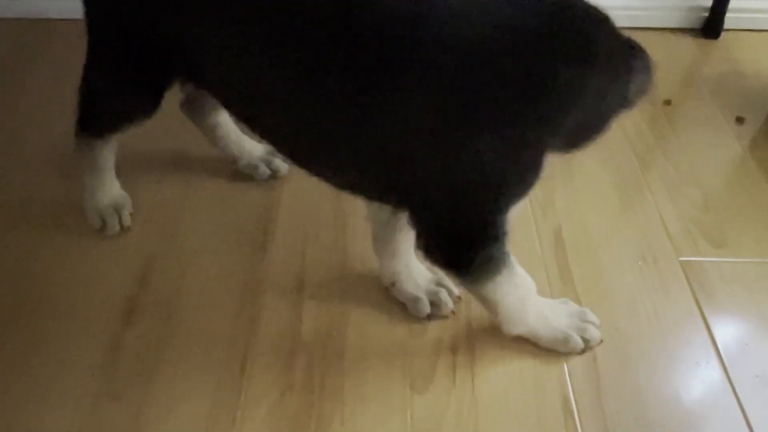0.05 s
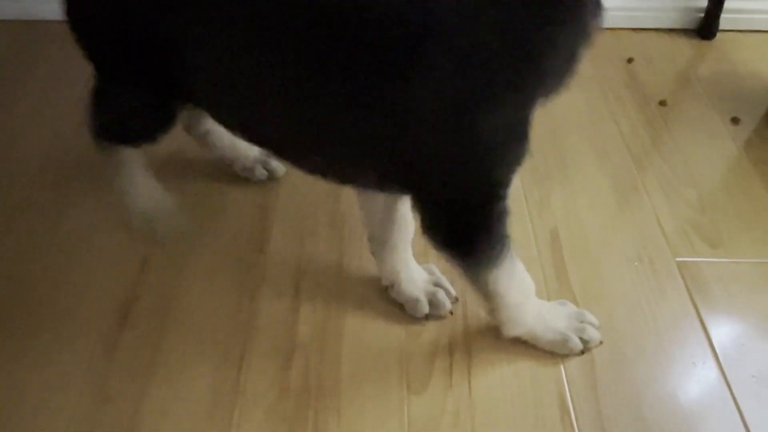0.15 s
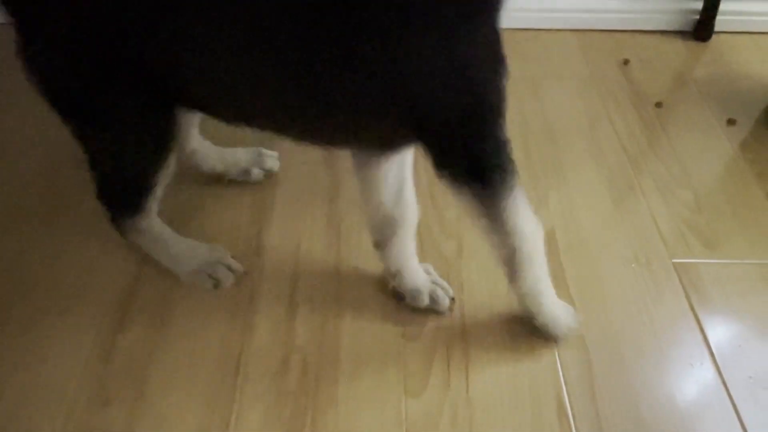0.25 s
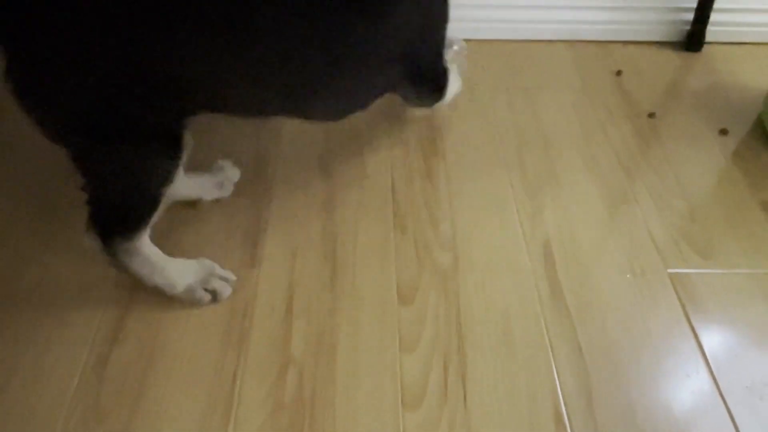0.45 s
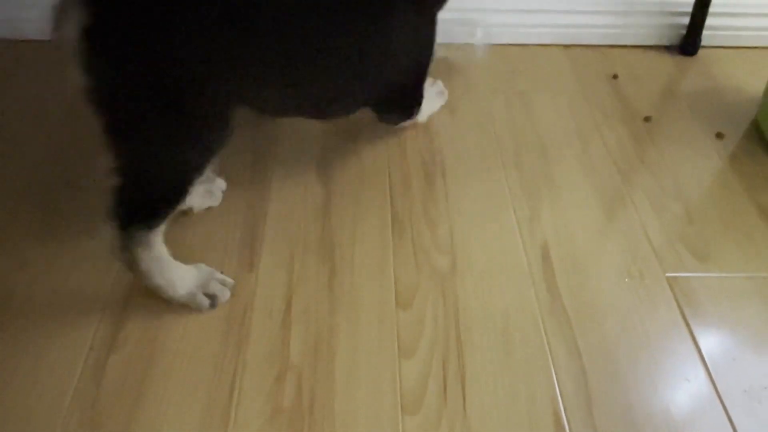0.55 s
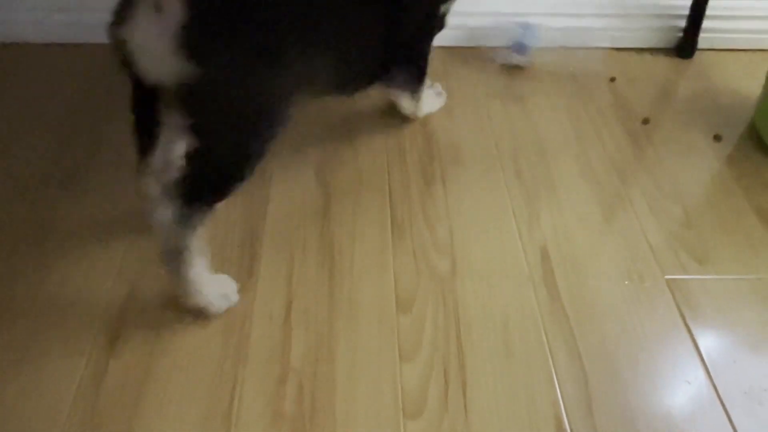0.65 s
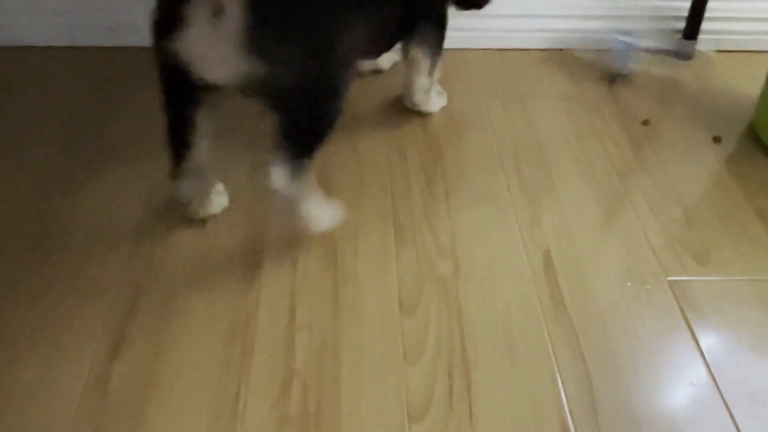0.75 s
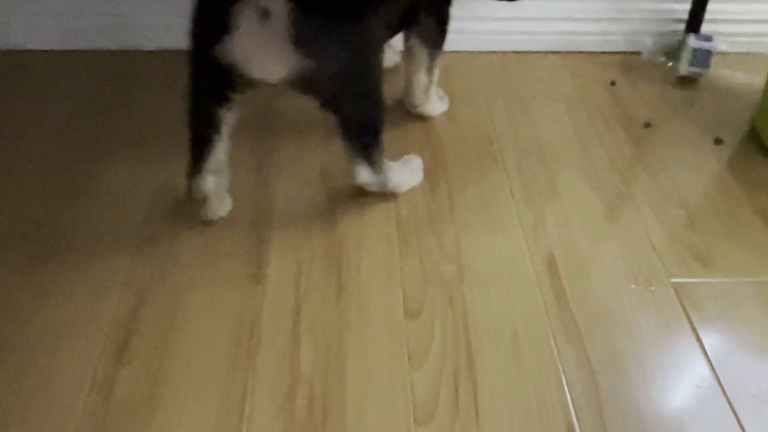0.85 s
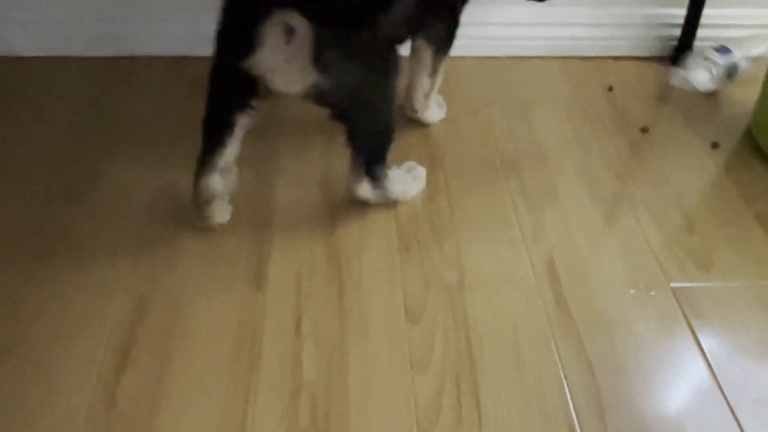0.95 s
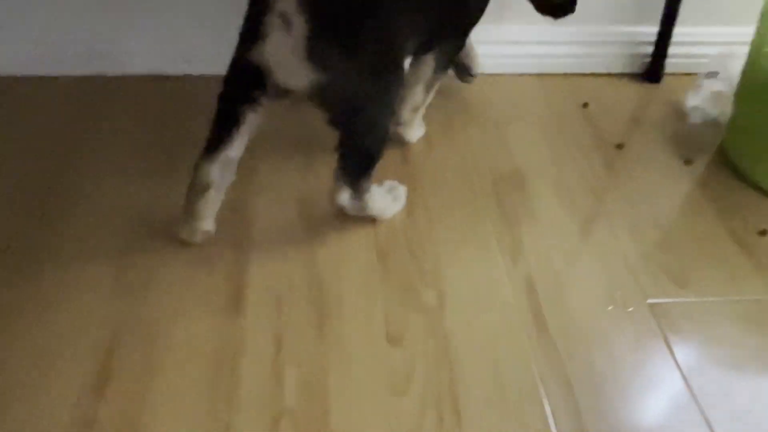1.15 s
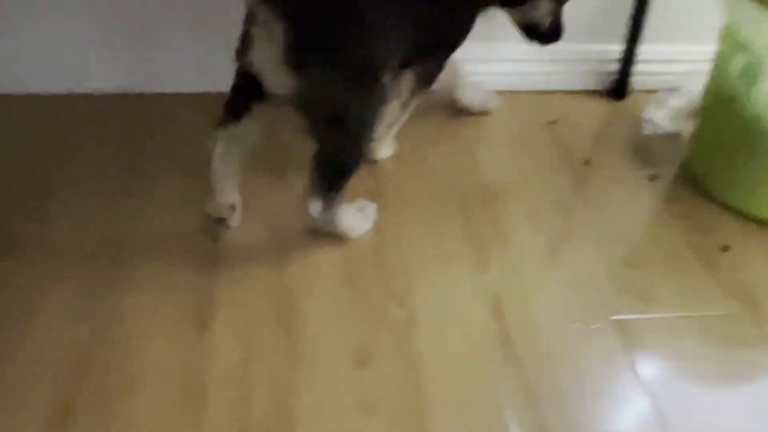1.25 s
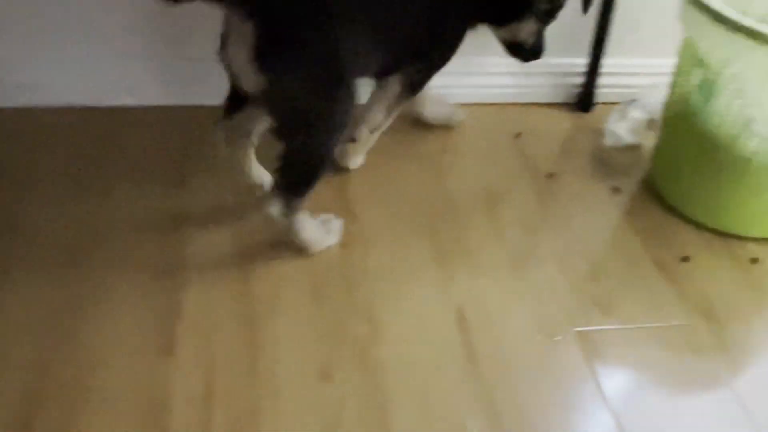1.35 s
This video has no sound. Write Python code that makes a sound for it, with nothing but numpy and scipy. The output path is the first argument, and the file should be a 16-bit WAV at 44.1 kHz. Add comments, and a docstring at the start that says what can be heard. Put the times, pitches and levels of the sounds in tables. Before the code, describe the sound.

A light plastic bottle clatters over a hard floor close by in a small, slightly echoing room. After soft dog steps and a low thump, it lands with a hollow knock, scrapes briefly, then bounces a few times, fading.

```python
"""Pads and claws tap on a laminate floor in a small, hard room: a dog is batting an empty plastic bottle. The
bottle lands with hollow pops and bounces to rest by the wall, while claws skid across the floor with a
crinkling scrape. Each impact excites damped modes of the bottle and the boards, and sliding friction makes the
scrape. The heavier steps make the floor boom. The room reverberates, over a low rumble and a faint hiss."""
import sys
import numpy as np
from scipy import signal
from scipy.fft import rfft, irfft, next_fast_len
from scipy.io import wavfile
from scipy.ndimage import uniform_filter1d

SR = 44100
rng = np.random.default_rng(int(sys.argv[2]) if len(sys.argv) > 2 else 0)


def master(y):
    """Save y as 16-bit WAV."""
    cut = np.clip(np.atleast_2d(y).T, -1, 1)
    pcm = np.round(cut * 32767)  # scale
    wavfile.write(sys.argv[1], SR, pcm.astype(np.int16))


N = 61739


def bottle():
    """Impact excitation: a blow sounds bottle, boards and room modes; light contacts only rattle."""
    # blows: t/s; hollow tone f/Hz, level/dB, rise/s, left lead/rad, left minus right/dB;
    # belly mode f/Hz, level/dB; panel f/Hz, level/dB, T60/s, overtone gain/dB;
    # clack level/dB, contact cut-off/Hz; crack level/dB; board knock level/dB, pitch ratio
    blows = [(.3900, 501.4, -2.5, 0.012, 1, -4, 719, -17, 1465, -6.5, 0.014, -45, -22, 2240, -33, -42, 0.89),
             (.5470, 484.7, -14, 0.0031, 0.53, -1.5, 662, -23.5, 1400, -1, 0.007, -27, -18.5, 3100, -30, -31, 1.1),
             (0.795, 529, -31.5, 0.0089, -1, 10, 795, -28, 1566, -27, 0.044, -6.5, -41.5, 5000, -35.5, -35.5, 1.18),
             (0.8572, 492.4, -5, 0.0076, -0.53, 5.5, 899, -20.5, 2385, -26.5, 0.043, -23.5, -28.5, 1880, -27, -16.5, 0.98),
             (1.035, 476, -16, 0.0063, -0.6, 2.5, 746, -36.5, 1570, -48, 0.027, -12, -47, 3020, -44, -29, 1.003),
             (1.1450, 507, -31, 0.012, -2.5, -1, 720, -38.5, 1770, -54, 0.065, -31, -43.5, 1800, -43.5, -37.5, 1.23)]
    # light contacts of the shell: t/s, level/dB
    rattles = [(0.468, -45.5), (0.503, -54), (0.565, -25.5), (0.577, -27), (.588, -25.5), (.593, -28),
               (0.61, -33.5), (.628, -31), (0.669, -38.5)]
    # buzz of the flexing wall around the hollow tone: f/Hz, relative level/dB
    flex_spectrum = [(120, -82), (280, -12), (480, 13.5), (650, -18.5), (900, -6.5), (1500, -38),
                     (4000, -81.5)]
    # bright crack of the impact: f/Hz, relative level/dB
    crack_spectrum = [(500, -31), (2000, 5), (3000, 15.5), (4500, 2), (8500, 3.5), (11000, -1.5),
                      (15000, -14), (17000, -34.5)]
    # modes of the struck boards: f/Hz at pitch ratio 1, relative level/dB, T60/s
    board_modes = [(183.8, -1, 0.06), (310, 4, 0.068), (389.2, -8, 0.24)]
    # standing waves of the room, set off by the hollow tone: f/Hz, relative level/dB, T60/s
    room_modes = [(286, -25.5, 0.308), (340, -53, 0.37), (396.5, -34.5, 0.63), (510, -22, 0.49),
                  (580, -45, 0.13), (704, -46, 0.29)]
    out = in_room(sum(amp(db) * clack(s) for s, db in rattles))
    for (s, hollow_hz, hollow_db, rise_s, lead_rad, pan_db, belly_hz, belly_db,
         panel_hz, panel_db, panel_t60, overtone_db,
         clack_db, contact_hz, crack_db, knock_db, board_pitch) in blows:
        hollow = amp(hollow_db) * hollow_tone(s, hollow_hz, rise_s, lead_rad, pan_db)
        flex = amp(hollow_db - 11.5) * burst(s, flex_spectrum, t60=0.097, rise_s=0.002)
        belly = ring(s, [(belly_hz, belly_db, 0.068)], rise_s=0.0024)
        panel = panel_pop(s, panel_hz, panel_db, panel_t60, overtone_db)
        shell = amp(clack_db) * contact_lowpass(clack(s), contact_hz)
        crack = amp(crack_db) * burst(s, crack_spectrum, t60=0.037, rise_s=0.0008)
        boards = [(board_pitch * hz, db, t60) for hz, db, t60 in board_modes]
        knock = amp(knock_db) * ring(s, boards, rise_s=0.0024)
        out += in_room(hollow, send_db=-1.5)
        out += in_room(flex + shell + crack + knock)
        out += in_room(belly + panel, send_db=-8)
        out += amp(hollow_db) * ring(s, room_modes, rise_s=0.013)
    return out


def hollow_tone(s, hz, rise_s, lead_rad, pan_db):
    """Damped resonance: one tone swells and dies, with a level and phase difference between the ears."""
    t = since(s)
    ears = np.array([[0.5], [-0.5]])
    swell = fade(t, t60=0.069) * (1 - np.exp(-(t / rise_s) ** 2))
    return 2 * swell * amp(pan_db * ears) * np.sin(2 * np.pi * hz * t + lead_rad * ears)


def panel_pop(s, hz, level_db, t60, overtone_db):
    """Plate vibration: the struck panel sounds a fundamental and inharmonic overtones."""
    # panel overtones: ratio to the fundamental, relative level/dB
    partials = [(1.74, 1), (2.23, -2.5), (3.06, -6)]
    overtones = [(ratio * hz, level_db + overtone_db + db, t60) for ratio, db in partials]
    return ring(s, [(hz, level_db, t60)] + overtones, rise_s=0.00044)


def clack(s):
    """Shell vibration: the thin plastic wall rings briefly over a dense spray of buckling noise."""
    # modes of the shell: f/Hz, relative level/dB, T60/s
    shell_modes = [(630, -3.5, 0.074), (803, 4, 0.039), (1048, 8, 0.069), (1315, 1, 0.037),
                   (1411, -2.5, 0.061), (1594, 5.5, 0.045), (1700, 9.5, 0.026), (1798, 2, 0.05),
                   (2400, -0.5, 0.045), (2700, -6.5, 0.097), (2940, -1, 0.029), (3740, -13, 0.027)]
    # buckling noise: f/Hz, relative level/dB
    buckling_spectrum = [(200, -9), (550, 3), (1000, -12), (1500, -4.5), (2100, -9), (3300, -10.5),
                         (4300, -21.5), (9000, -28), (16000, -95)]
    ringing = 0.49 * ring(s, shell_modes, rise_s=0.00095)
    buckling = amp(5) * burst(s, buckling_spectrum, t60=0.063, rise_s=0.00046)
    return ringing + buckling


def contact_lowpass(x, cutoff_hz):
    """A contact acts as a second-order low-pass on the vibration it excites."""
    return filtered(x, lambda hz: 1 / (1 + 1j * np.sqrt(2) * hz / cutoff_hz - (hz / cutoff_hz) ** 2))


def skid():
    """Sliding friction: a grainy scrape swells and dies, hissing where fastest and leaving a low ring."""
    # scrape: f/Hz, relative level/dB
    scrape_spectrum = [(250, 3), (600, -3), (1600, 0), (2200, -2.5), (2900, 4.5), (4000, -11), (5200, -6.5),
                       (6500, -12.5), (8200, -5.5), (11000, -14.5), (15000, -19), (17000, -47)]
    # hiss of the fastest sliding: f/Hz, relative level/dB
    hiss_spectrum = [(3500, -29), (5300, 3.5), (6500, -6), (8200, -11), (12000, -17.5)]
    # modes of bottle and room that hum along: f/Hz, relative level/dB, T60/s
    hum_modes = [(493, 4, 0.29), (319.4, -1.5, 0.2), (620, -8, 0.18), (770, -11, 0.56), (1050, -1, 0.25)]
    peak_s, peak_db, rise_db_per_s, fall_db_per_s, roughness_db = 0.5915, -25.5, 368, 212, 2
    t = np.arange(N) / SR - peak_s
    level_db = peak_db + np.minimum(rise_db_per_s * t, -fall_db_per_s * t)
    grain = amp(roughness_db * unit(uniform_filter1d(rng.standard_normal(N), size=60)))
    hum = amp(-24.5) * ring(peak_s, hum_modes, rise_s=0.018)
    hiss = amp(-21.5) * burst(peak_s, hiss_spectrum, t60=0.052, rise_s=0.0045)
    scrape = amp(level_db) * unit(noise(scrape_spectrum) * grain)
    return in_room(scrape) + hiss + hum


def paw_steps():
    """Soft and hard contact: pads excite low modes of the boards, claws scratch across a broad band."""
    # steps: t/s, pad pitch ratio, pad level/dB, claw level/dB
    steps = [(.000, 1.084, -32.5, -35), (0.0544, 1.06, -29, -41.5), (0.101, 1.02, -34.5, -41.5),
             (0.125, 1, -42, -31), (0.1315, 1.08, -26.5, -34.5), (0.2226, 0.72, -35, -36),
             (0.298, 0.98, -28.5, -34), (0.4931, 1.28, -32, -26), (0.5018, 1.3, -27.5, -22.5),
             (0.67, 0.91, -28, -75), (.737, 0.98, -36, -35.5), (.897, 1.03, -25, -31.5),
             (1.139, 1.2, -72, -39.5), (1.246, 0.94, -45, -48.5)]
    # boards under a pad: f/Hz at pitch ratio 1, relative level/dB, T60/s
    pad_modes = [(313.4, 1.5, 0.085), (383.7, -9, 0.19), (506, 2, 0.072)]
    # claw scratch: f/Hz, relative level/dB
    claw_spectrum = [(400, 17.5), (1500, 14), (3000, 10.5), (4500, 0), (8500, 4.5), (11000, -2.5),
                     (15000, -13.5), (17000, -12)]
    out = np.zeros((2, N))
    for s, pitch, pad_db, claw_db in steps:
        modes = [(pitch * hz, db, t60) for hz, db, t60 in pad_modes]
        pad = amp(pad_db) * ring(s, modes, rise_s=0.0023)
        claw = amp(claw_db) * burst(s, claw_spectrum, t60=0.065, rise_s=0.0022)
        out += in_room(pad + claw)
    return out


def claw_clicks():
    """A brief impact has a wide spectrum: a claw ticks close by and rings in its own high modes."""
    # clicks: t/s, tick level/dB, snap level/dB, reverberation gain/dB
    clicks = [(0.234, -30, -43.5, -2), (0.9444, -28.5, -29.5, 2.5)]
    # tick: f/Hz, relative level/dB
    tick_spectrum = [(500, 11.5), (3000, 2.5), (5000, -2.5), (8000, 2), (11000, 1.5), (16000, 2)]
    # modes of the claw: f/Hz, relative level/dB, T60/s
    claw_modes = [(5050, -7.5, 0.034), (7610, -5, 0.023), (9300, -6, 0.023)]
    out = np.zeros((2, N))
    for s, tick_db, snap_db, send_db in clicks:
        tick = amp(tick_db) * burst(s, tick_spectrum, t60=0.022, rise_s=0.0006)
        out += in_room(tick, send_db)
        out += amp(snap_db) * ring(s, claw_modes, rise_s=0.0005)
    return out


def floor_boom():
    """Free vibration: the dog's weight sets the whole floor swinging in its low modes."""
    # heavy footfalls: t/s, level/dB
    footfalls = [(0.2411, -17.5), (0.276, -24), (0.517, -29), (0.583, -31.5), (0.649, -35), (0.898, -37.5),
                 (1.316, -42.5)]
    # modes of the floor on its joists: f/Hz, relative level/dB, T60/s
    floor_modes = [(62.9, 2, 0.26), (85.6, 8, 0.045), (128.5, 0, 0.063), (190, -4, 0.022)]
    return sum(amp(db) * ring(s, floor_modes, rise_s=0.0015) for s, db in footfalls)


def in_room(x, send_db=0):
    """Reverberation: the direct sound is followed by a diffuse tail, partly different in each ear."""
    # reverberation time: f/Hz, T60/s
    decay_times = [(100, 0.21), (500, 0.35), (1500, 0.28), (4000, 0.26), (9000, 0.36), (16000, 0.19)]
    # colour of the tail: f/Hz, relative level/dB
    colour = [(60, -8), (300, -15), (500, -13.5), (750, -4), (2000, -3), (8000, -1), (16000, -3.5)]
    # width of the tail: f/Hz, ratio of side to mid
    width = [(100, .5), (300, .9), (500, 1.25), (2000, 1.15), (4500, 1.05), (8000, .55), (16000, .6)]
    build_up_s = 0.0017
    x = x * np.ones((2, 1))
    hz, t, spectra = signal.stft(rng.standard_normal((2, SR * 3 // 4)), SR, nperseg=256)
    tail = signal.istft(spectra * fade(t, along(decay_times, hz)[:, None]), SR, nperseg=256)[1]
    tail *= 1 - np.exp(-np.arange(tail.shape[1]) / SR / build_up_s)
    tail /= np.linalg.norm(tail[0])
    wet = signal.fftconvolve(x.mean(axis=0)[None], tail, axes=1)[:, :N]
    gain = lambda f: amp(along(colour, f) - 1.5)
    mid = filtered(wet[0], gain)
    side = filtered(wet[1], lambda f: gain(f) * along(width, f))
    return x + amp(send_db) * np.array([mid + side, mid - side])


def background():
    """Ambient noise: low room rumble and faint hiss, less correlated between the ears in the treble."""
    # spectra of rumble and hiss: f/Hz, relative level/dB
    rumble_spectrum = [(20, -29), (40, 6.5), (60, 6), (90, -2), (160, -1.5), (330, -8), (500, -6),
                       (700, -26.5), (2000, -25.5), (8000, -59)]
    hiss_spectrum = [(100, 15.5), (700, -9), (2000, 3.5), (4000, 0.5), (9000, -2.5), (11500, -7.5),
                     (13000, -29), (16000, -10)]
    # their envelopes: t/s, level/dB
    rumble_levels = [(0, -48.5), (.36, -42), (.66, -50.5), (1.0, -45), (1.2, -45.5), (1.4, -61)]
    hiss_levels = [(0, -44.5), (.1, -57), (.37, -67.5), (.8, -50), (1.12, -62), (1.3, -62.5), (1.4, -56.5)]
    level = lambda rows: amp(np.interp(np.arange(N) / SR, *np.transpose(rows)))
    air = lambda: level(rumble_levels) * noise(rumble_spectrum) + level(hiss_levels) * noise(hiss_spectrum)
    mid = air()
    side = filtered(air(), lambda hz: 0.71 * hz / (hz + 350))
    return np.array([mid + side, mid - side])


def ring(s, modes, rise_s, scatter_db=1.5):
    """Modal superposition: damped sines of alternating sign, their levels varying from blow to blow."""
    t = since(s)
    tones = np.zeros(N)
    for k, (hz, db, t60) in enumerate(modes):
        gain = (-1) ** k * amp(db + scatter_db * rng.standard_normal())
        tones += gain * fade(t, t60) * np.sin(2 * np.pi * hz * t)
    return tones * (1 - np.exp(-t / rise_s))


def burst(s, spectrum, t60, rise_s):
    """A transient of coloured noise with exponential rise and decay."""
    t = since(s)
    return noise(spectrum) * fade(t, t60) * (1 - np.exp(-t / rise_s))


def noise(spectrum):
    """Spectral shaping of white noise, scaled to rms 1."""
    return unit(filtered(rng.standard_normal(N), lambda hz: amp(along(spectrum, hz))))


def filtered(x, response):
    """Linear filtering: the spectrum of x times a complex frequency response."""
    size = next_fast_len(N + SR // 2)
    hz = np.fft.rfftfreq(size, 1 / SR)
    return irfft(rfft(x, size) * response(hz), size)[..., :N]


def fade(t, t60):
    """Exponential decay, 60 dB in t60 seconds, starting when t leaves zero."""
    return (t > 0) * np.exp(-np.log(1000) * t / t60)


def since(s):
    """Seconds since s, zero before it."""
    return np.maximum(np.arange(N) / SR - s, 0)


def along(points, hz):
    """Interpolation of (f/Hz, value) points on a logarithmic frequency axis."""
    freqs, values = np.transpose(points)
    return np.interp(np.log(hz + 1), np.log(freqs + 1), values)


def unit(x):
    """Normalisation to rms 1."""
    return x / np.sqrt(np.mean(x ** 2) + 1e-20)


def amp(db):
    """Decibels to amplitude ratio."""
    return 10 ** (np.asarray(db) / 20)


def ear_responses(hz):
    """Interaural differences: each frequency reaches the two ears with its own level and phase."""
    # level difference: f/Hz, left minus right/dB
    balance = [(100, 0), (500, 0), (1200, -1), (2400, 2), (4000, 2), (8000, 0), (16000, 0)]
    # phase difference: f/Hz, left lead/rad
    left_lead = [(100, -0.076), (500, -0.23), (900, -1.02), (1600, -1.45), (2400, 0.98), (4000, 1),
                 (6000, -0.82), (16000, -0.6)]
    ears = np.array([[0.5], [-0.5]])
    return amp(along(balance, hz) * ears) * np.exp(1j * along(left_lead, hz) * ears)


def scene():
    """Superposition: bottle and paws differ between the ears, while the floor booms in the middle."""
    play = bottle() + paw_steps() + claw_clicks() + skid()
    return filtered(play, ear_responses) + floor_boom() + background()


def record(dry):
    """Band limiting: the recorder loses the deepest bass and keeps nothing above its upper limit."""
    low_cut_hz, top_hz = 46.4, 16000
    return filtered(dry, lambda hz: (hz < top_hz) * (1 - np.exp(-(hz / low_cut_hz) ** 4)))


dry = scene()
out = record(dry)
master(out)
```